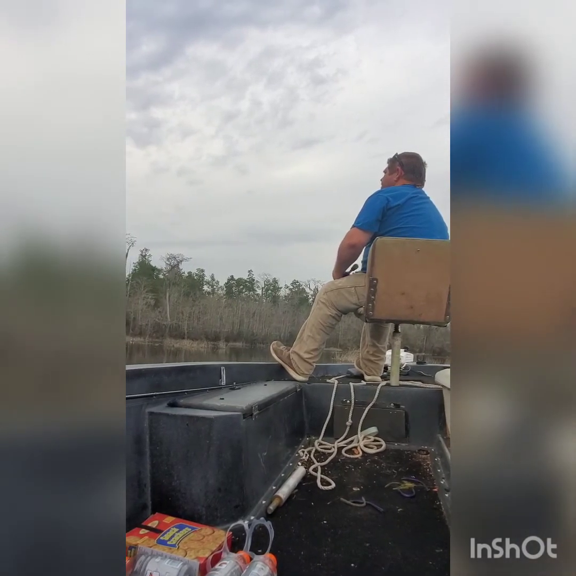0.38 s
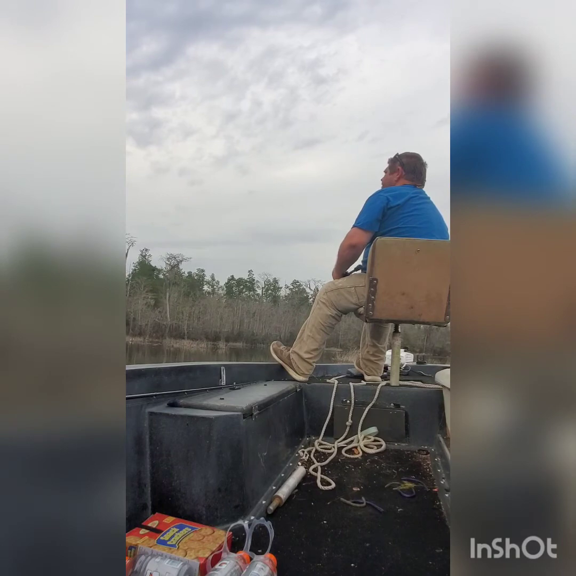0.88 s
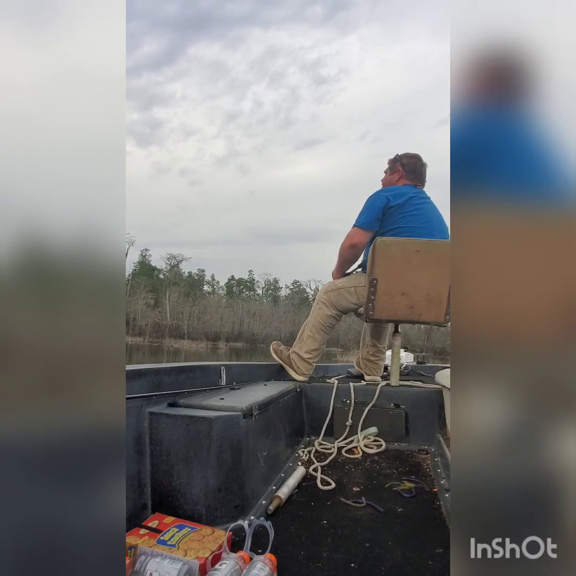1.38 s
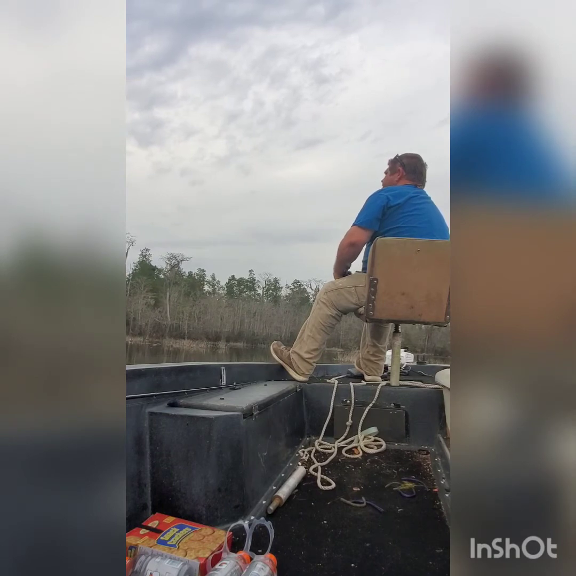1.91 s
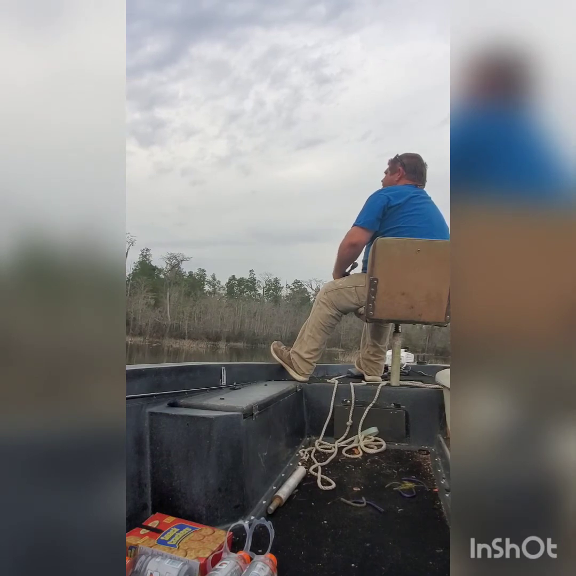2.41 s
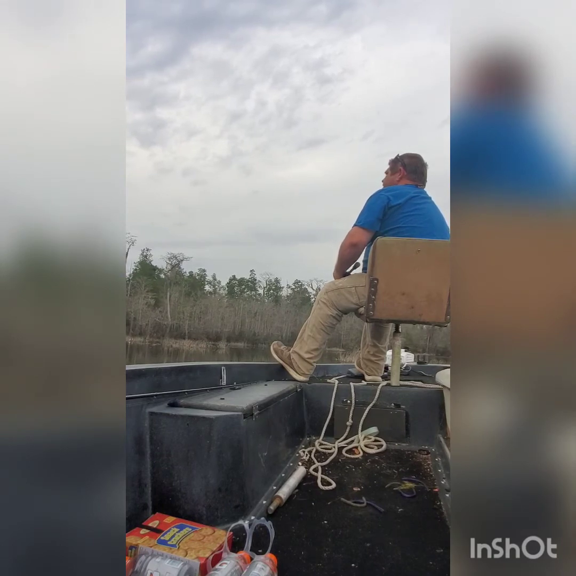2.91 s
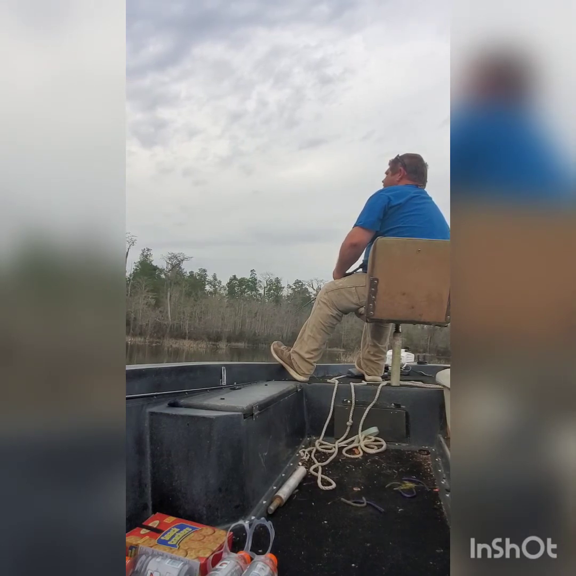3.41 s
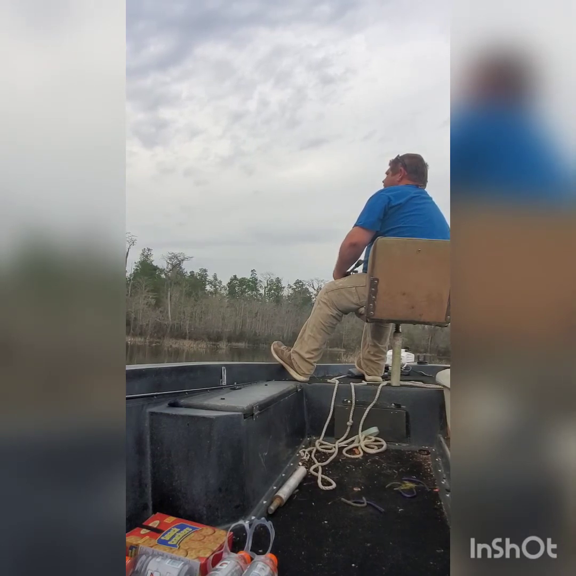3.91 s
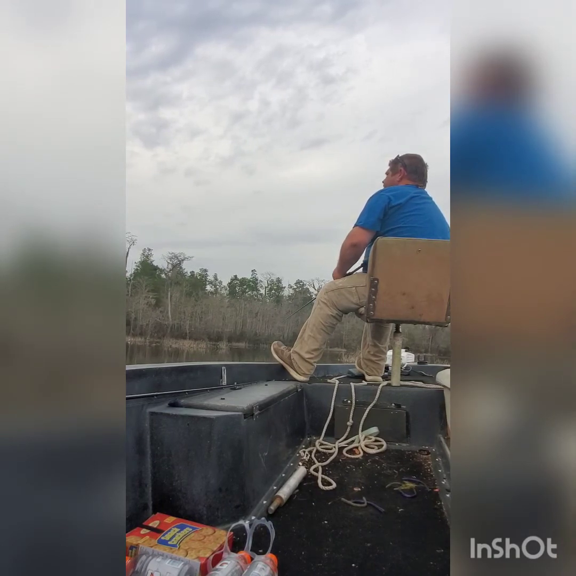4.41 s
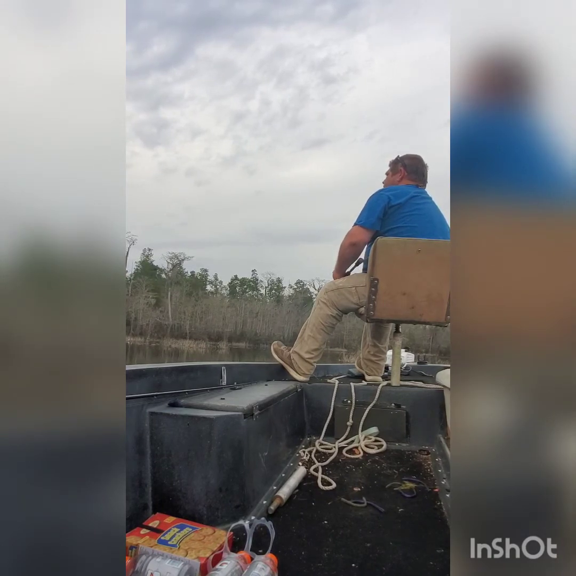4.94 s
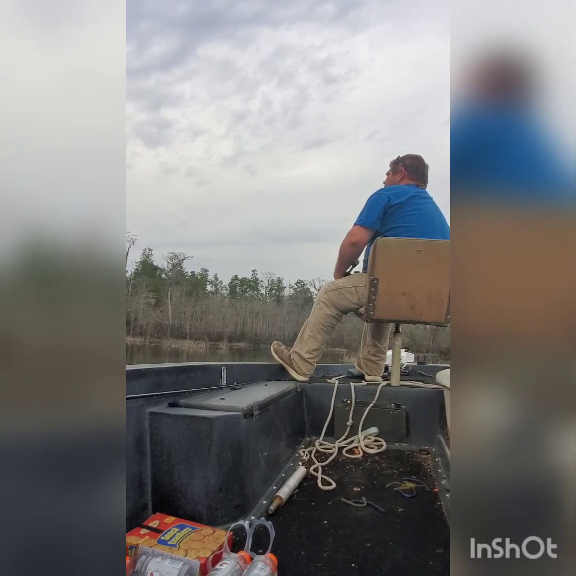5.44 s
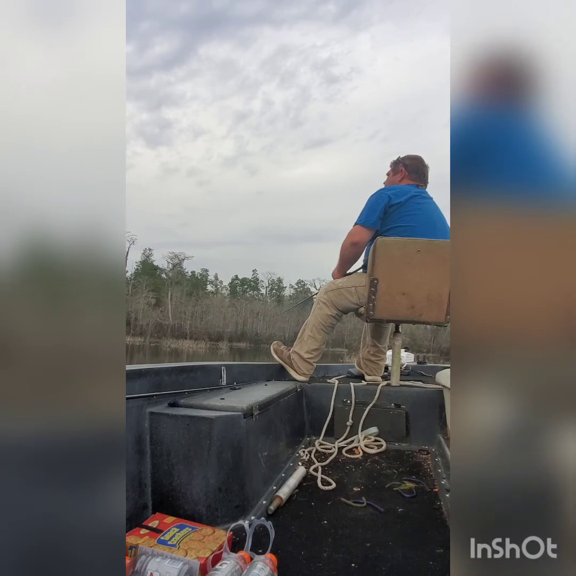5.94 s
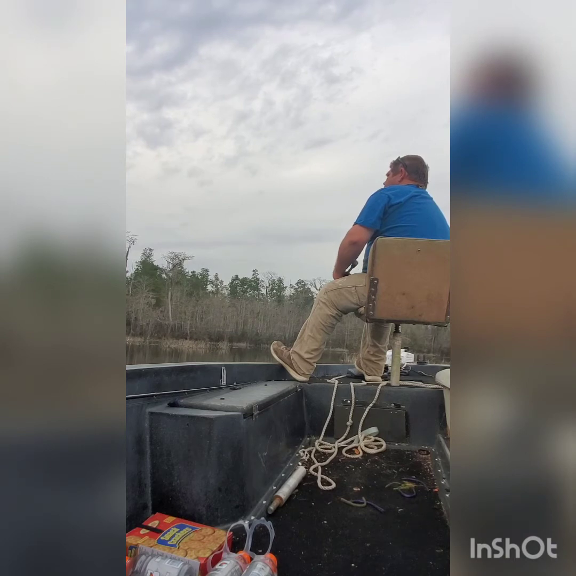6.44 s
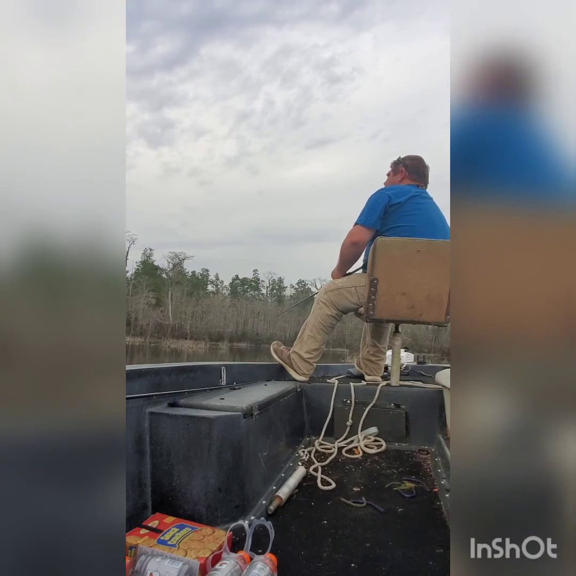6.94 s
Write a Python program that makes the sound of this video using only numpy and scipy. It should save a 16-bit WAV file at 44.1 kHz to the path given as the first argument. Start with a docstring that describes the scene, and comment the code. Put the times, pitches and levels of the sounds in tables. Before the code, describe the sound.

Far across calm swamp water, a boat engine drones away on a deep note, swelling, nearly vanishing, then returning, above faint hiss.

```python
"""Swamp: a six-cylinder boat motor hums far off and slowly loses pitch as it draws away; its tones swell and fade.
The motor is sines on multiples of the engine cycle; exhaust and wake rumble under it as shaped noise.
Frogs trill faintly as rising, noise-blurred tones; insects buzz on the left as narrow noise bands.
The microphones hiss as broad noise, separate in each ear."""
import sys
import numpy as np
from scipy import signal
from scipy.fft import rfft, irfft
from scipy.io import wavfile
from scipy.ndimage import uniform_filter1d

SR = 44100
rng = np.random.default_rng(int(sys.argv[2]) if len(sys.argv) > 2 else 0)


def invert_db(x):
    """Field ratio 10**(x/20) for x, a level in decibels (scalar or array-like)."""
    u = np.asarray(x, float) / 20
    return 10 ** u


def inscribe(sig):
    """Save sig as 16-bit PCM at rate SR to the path in sys.argv[1].

    A 1-D sig is mono; a 2-D sig holds one channel per row.
    Samples are clipped to [-1, 1] before scaling.
    """
    pcm = np.round(np.clip(np.atleast_2d(sig).T, -1, 1) * 32767)
    wavfile.write(sys.argv[1], SR, pcm.astype(np.int16))


N = 312228
T = np.arange(N) / SR  # s
F = np.arange(N // 2 + 1) * SR / N + 1e-3  # Hz, kept above 0 for logs and division


def level(x, db):
    """Scale to an rms level in dB."""
    return x * invert_db(db) / np.sqrt(np.mean(x ** 2))


def tone_db(points):
    """Interpolate (frequency [Hz], level [dB]) points on a log-frequency axis."""
    hz, db = np.transpose(points)
    return np.interp(np.log(F), np.log(hz), db)


def noise(gain):
    """Fresh noise with the given gain at each frequency."""
    return irfft(rfft(rng.standard_normal(N)) * gain, N)


def walk(rate_hz):
    """Random levels held 1 / rate_hz s and smoothed twice over that time; spread near 1."""
    hold = int(SR / rate_hz)
    held = np.repeat(rng.standard_normal(N // hold + 1), hold)
    slewed = uniform_filter1d(uniform_filter1d(held, hold), hold)
    return 1.3 * slewed[:N]


def hiss():
    """Unrelated microphone hiss and far air in each ear, wavering slightly in level together."""
    # hiss spectrum: (frequency [Hz], relative density [dB per Hz])
    hiss_tone = [(600, -26), (900, 0.5), (1500, -0.5), (2100, -6.5), (3000, -7), (4100, -8.5), (5200, -13),
                 (7000, -14), (9300, -15.5), (11000, -13), (15700, -10.5)]
    # hiss balance: (frequency [Hz], left minus right [dB])
    hiss_pan = [(1500, 0), (2600, -0.5), (4000, -3), (5500, 2), (8000, 5), (10000, 1), (15000, -0.5)]
    mean_db = -79
    waver = invert_db(0.71 * walk(5.1))
    ears = []
    for sign in (1, -1):
        gain = invert_db(tone_db(hiss_tone) + sign * tone_db(hiss_pan) / 2)
        ears.append(level(noise(gain), mean_db))
    return waver * np.array(ears)


def insects():
    """A dense chorus as a few noise bands, throbbing irregularly together, from the left."""
    # chorus bands: (centre [Hz], width [Hz], left level before throbbing [dB])
    insect_bands = [(7240, 1000, -91), (7920, 1600, -87.5), (6260, 800, -96)]
    chorus = 0
    for centre_hz, width_hz, db in insect_bands:
        band = 1 / (1 + (2 * (F - centre_hz) / width_hz) ** 4)
        chorus = chorus + level(noise(band), db)
    throb_db = 1.1 * walk(6) + 1.5 * walk(17)
    left_right_db = np.array([[0], [-20]])
    return chorus * invert_db(throb_db + left_right_db)


def frogs():
    """Far trills: throbs of a throat pouch rising in pitch, blurred by trees so each ear hears them differently."""
    # trills: (start [s], end [s], first pitch [Hz], level before shaping [dB], left minus right [dB])
    trills = [(-.15, 0.237, 3040, -84.5, -3), (0.151, 0.447, 3170, -91, -4), (0.339, 0.779, 3015, -90, 4),
              (0.541, 0.955, 3055, -88.5, -5), (1.03, 1.158, 2960, -90, 1), (1.185, 1.304, 3010, -87, 0),
              (1.343, 1.64, 3050, -86.5, -1), (4.082, 4.25, 3075, -95, 1), (4.963, 5.247, 3010, -94, 3),
              (5.6, 5.952, 3005, -95, 0), (6.424, 6.667, 3010, -92, 1), (6.857, 7.1, 3050, -93, 0)]
    rise_hz_per_s, fade_db, throb_hz = 600, -3.5, 22  # fade over the length of a trill
    out = np.zeros((2, N))
    blur = 1 / (1 + (F / 105) ** 4)
    for start_s, end_s, first_hz, db, pan_db in trills:
        length_s = end_s - start_s
        along = np.clip((T - start_s) / length_s, 0, 1)
        shape = np.sin(np.pi * along) ** 0.24 * invert_db(fade_db * (along - 0.5))
        pitch_hz = first_hz + rise_hz_per_s * length_s * along
        phase = 2 * np.pi * np.cumsum(pitch_hz) / SR
        throb = 1 + 0.19 * np.sin(2 * np.pi * throb_hz * (T - start_s))
        for ear, sign in enumerate((1, -1)):
            rough = noise(blur) * np.sin(phase) + noise(blur) * np.cos(phase)
            out[ear] += shape * throb * level(rough, db + sign * pan_db / 2)
    return out


def rumble():
    """Scattered exhaust and wake noise, nearly the same left and right; the upper part fades first with distance."""
    # gains of the rumble's parts: (time [s], deep [dB], middle [dB], upper [dB])
    part_levels = [(0.2, -45, -47, -46), (1.0, -45, -48, -45), (1.7, -51, -47, -46.5), (2.5, -49, -46, -48),
                   (3.3, -45.5, -45.5, -49), (4.4, -49, -49.5, -50), (5.1, -47, -47.5, -50.5),
                   (5.5, -51.5, -48.5, -50.5), (5.9, -46.5, -47.5, -50.5), (6.7, -47.5, -48.5, -51.5)]
    # spectrum of the whole: (frequency [Hz], relative density [dB per Hz])
    rumble_tone = [(22, -30.5), (35, -16), (55, -3.5), (66, -3.5), (75, 2.5), (86, -6), (105, -7),
                   (135, -10.5), (152, -5), (175, -10), (210, -10.5), (260, -10.5), (330, -15), (420, -21),
                   (500, -20), (580, -26), (700, -30), (870, -37.5), (1000, -54.5), (1300, -75.5)]
    # stereo spread: (frequency [Hz], side minus mid [dB])
    rumble_side = [(30, -5.5), (60, -17), (110, -23.5), (200, -18.5), (380, -15.5), (700, -11)]
    # balance: (frequency [Hz], right minus left [dB])
    rumble_pan = [(60, 0), (380, 0.7), (700, 5.5)]
    time_s, *columns = np.transpose(part_levels)
    deep_db, middle_db, upper_db = (np.interp(T, time_s, column) for column in columns)
    pan_db = tone_db(rumble_pan)
    mid, side = rfft(rng.standard_normal((2, N)))
    side = side * invert_db(tone_db(rumble_side))
    gain = invert_db(tone_db(rumble_tone) + np.array([-pan_db, pan_db]) / 2)
    ears = gain * (mid + side * np.array([[1], [-1]]))
    ears = ears / np.sqrt(np.mean(irfft(ears, N) ** 2))  # unit rms before the split
    deep = 1 / (1 + (F / 105) ** 8)
    upper = 1 / (1 + (410 / F) ** 8)
    middle = 1 - deep - upper
    return (invert_db(deep_db) * irfft(ears * deep, N) + invert_db(middle_db) * irfft(ears * middle, N)
            + invert_db(upper_db) * irfft(ears * upper, N))


def motor():
    """Clean tones on the engine cycle; moving air makes each one flicker and waver by itself."""
    # firing tone before flicker: (time [s], level [dB])
    firing_levels = [(0.05, -51), (0.7, -49.5), (1.3, -46), (1.7, -45), (2.3, -50), (2.55, -48),
                     (2.95, -44), (3.65, -45), (4.1, -46.5), (4.75, -49), (5.05, -54.5), (5.2, -66),
                     (5.47, -65), (5.62, -49.5), (5.85, -45), (6.05, -49.5), (6.35, -50.5), (6.6, -59.5),
                     (6.9, -53), (7.05, -51.5)]
    # other tones of the engine cycle, each swelling once:
    # (multiple of the six-firing cycle [-], loudest at [s], peak before flicker [dB], spread [s])
    other_orders = [(3, 3.3, -64.5, 2.3), (8, 4.1, -57.5, 0.74), (9, 2.8, -60, 1.3), (14, 2.47, -60.5, 1.6),
                    (15, 1.5, -63.5, 0.56), (16, 2.8, -69, 1.3), (17, 0.5, -64, 1.5), (18, 1.8, -62.5, 1.),
                    (20, 1.8, -70.5, 0.77), (23, 0.86, -71, 0.54), (24, 1.4, -73, 1.1), (26, 1.1, -70, 1.)]
    cylinders = 6
    # firing rate falls in one smooth S: rate at its middle, half the full slide
    middle_hz, half_slide_hz, middle_s, slide_s = 120.2, 3.2, 4.3, 2.2
    from_middle_s = T - middle_s
    firing_hz = middle_hz - half_slide_hz * from_middle_s / np.hypot(from_middle_s, slide_s)
    cycle = 2 * np.pi * np.cumsum(firing_hz) / SR / cylinders

    firing_db = np.interp(T, *np.transpose(firing_levels))
    out = invert_db(firing_db + 1.2 * walk(9)) * np.sin(cylinders * cycle + 0.15 * walk(12))

    # the octave is faint throughout and swells once
    floor_db, swell_db, loudest_s, rise_s, fall_s = -66.5, -53, 1.946, 0.68, 0.22
    late_s = T - loudest_s
    swell = np.exp(-(late_s / np.where(late_s < 0, rise_s, fall_s)) ** 2 / 2)
    octave = invert_db(floor_db) + invert_db(swell_db) * swell
    out = out + octave * invert_db(1.5 * walk(9.7)) * np.sin(2 * cylinders * cycle + 0.3 * walk(10))

    for order, peak_s, peak_db, spread_s in other_orders:
        swell = np.exp(-((T - peak_s) / spread_s) ** 2 / 2) * invert_db(peak_db + 1.5 * walk(3))
        start_phase = 2 * np.pi * rng.random()
        out = out + swell * np.sin(order * cycle + start_phase + 0.4 * walk(4))
    return np.sqrt(2) * out  # sine levels are rms


def scene():
    """Motor slightly to the right over rumble and swamp."""
    motor_pan = invert_db(np.array([[-0.25], [0.25]]))
    return hiss() + insects() + frogs() + rumble() + motor() * motor_pan


def low_pass(x):
    """Removes everything above the highest recorded frequency."""
    return signal.sosfilt(signal.butter(12, 15900, fs=SR, output="sos"), x)


def record(dry):
    """Fade in over a few milliseconds and finish the mix."""
    fade_in_s = 0.004
    fade = np.sin(np.pi / 2 * np.clip(T / fade_in_s, 0, 1)) ** 2
    return low_pass(dry * fade)


dry = scene()
out = record(dry)
inscribe(out)
```